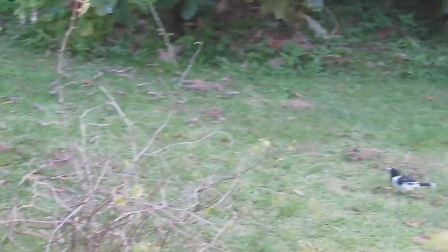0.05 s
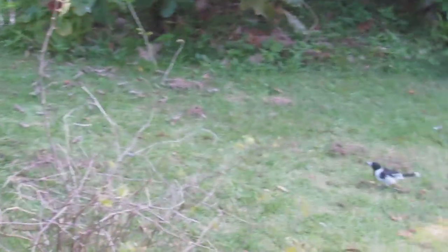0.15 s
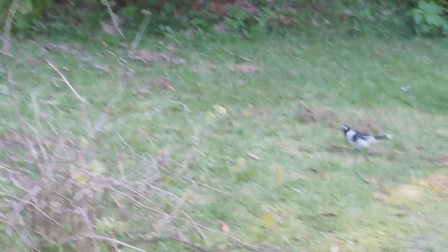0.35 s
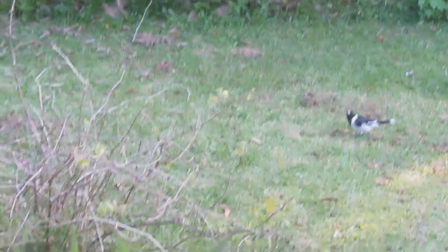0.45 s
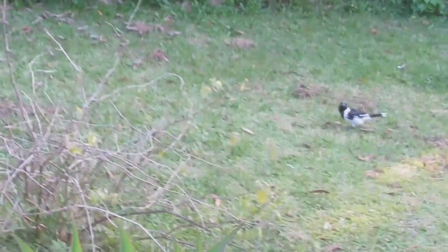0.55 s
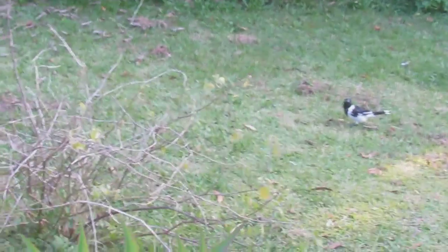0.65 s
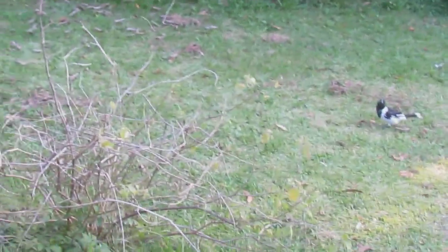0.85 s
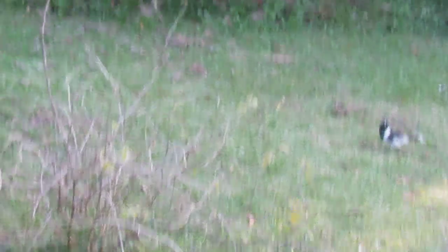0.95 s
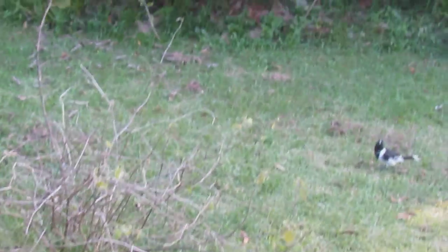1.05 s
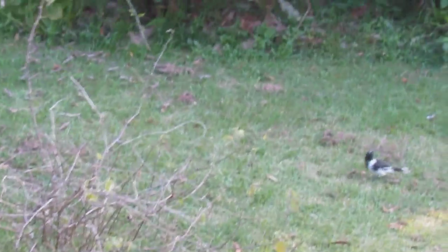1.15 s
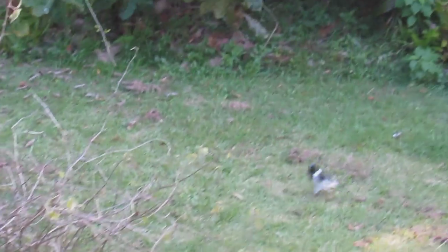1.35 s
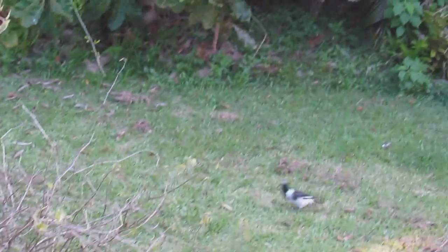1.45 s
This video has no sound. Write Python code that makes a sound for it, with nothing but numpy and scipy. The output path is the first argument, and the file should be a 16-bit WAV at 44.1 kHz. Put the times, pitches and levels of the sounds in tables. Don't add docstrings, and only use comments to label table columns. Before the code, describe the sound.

Moderately distant from the microphone, a bird rasps harshly, growing louder and brighter, then leaps to a brief pure whistle that rings off trees; far birds twitter thinly after it, over soft hum and hiss.

```python
import sys
import numpy as np
from scipy import signal
from scipy.fft import rfft, irfft, next_fast_len
from scipy.io import wavfile
from scipy.ndimage import uniform_filter1d, map_coordinates

SR = 44100
rng = np.random.default_rng(int(sys.argv[2]) if len(sys.argv) > 2 else 0)


def store_pcm(level_fs):
    pcm = np.round(np.clip(level_fs, -1, 1) * 32767).astype(np.int16)
    wavfile.write(sys.argv[1], SR, np.atleast_2d(pcm).T)


def volts_from_db(level):
    exponent = np.asarray(level, float) / 20
    return 10 ** exponent


N = 66150
TIME = np.arange(N) / SR
SIDE = np.array([[.5], [-.5]])


def unit(x):
    return x / np.sqrt(np.mean(x ** 2) + 1e-20)


def along(points, hz):
    f, values = np.transpose(points)
    return np.interp(np.log(hz + 1), np.log(f + 1), values)


def curves(rows):
    s, *columns = np.transpose(rows)
    return [np.interp(TIME, s, column) for column in columns]


def wobble(rate):
    return map_coordinates(rng.standard_normal(N // 8), [TIME * rate])


def tone_phase(hz):
    return 2 * np.pi * np.cumsum(hz) / SR


def filtered(x, response):
    m = next_fast_len(N + SR // 2)
    return irfft(rfft(x, m) * response(np.fft.rfftfreq(m, 1 / SR)), m)[..., :N]


def resonances(rows, f):
    return sum(volts_from_db(db) * (1j * f * w / (c * c - f * f + 1j * f * w)) ** 2 for c, w, db in rows)


# frequency in Hz, lead of left over right in radians.
PHASE_LEAD = [(100, -2.07), (6000, 0.56), (8200, -2), (11000, -1.07), (15000, -1.1)]


def ports(x, pan):
    return filtered(x, lambda f: volts_from_db(SIDE * along(pan, f)) * np.exp(1j * SIDE * along(PHASE_LEAD, f)))


# time in seconds, pulse pitch in Hz, flutter in cycles per second,
# level in dB, flutter depth on the low partials (0-1).
RASP = [(.128, 607.8, 142.5, -48, 0.65), (.16, 610, 143, -30.5, 0.2), (.22, 631, 108.5, -31.5, 0.18),
        (.3, 694.7, 116.5, -29.5, 0.07), (.432, 750, 118, -30.5, 0.55), (.443, 602.2, 121, -26, 0.74),
        (.55, 714.4, 127, -22.5, 0), (.61, 835.5, 138.6, -20.5, 0.37), (.66, 954, 135, -17.5, 1.1),
        (.716, 1075, 140, -16.5, 0.2), (.78, 1197, 148.4, -21, 0.32), (.8, 1548, 126, -17, 0),
        (.818, 1950, 150, -32, 0.9)]
POSTURE_S = [
    .22,
    .41,
    .46,
    .59,
    .655,
    .76,
]
# resonance in Hz, width in Hz, level in dB.
SHUT = [(724, 320, -7), (1233, 184, 1), (2580, 370, -12), (3650, 590, -7), (4800, 970, -3), (6120, 710, -6),
        (7660, 1760, -10.5), (10100, 1200, -14)]
CLOSED = [(808, 200, 1), (1165, 120, 8), (1680, 114, 8), (2900, 510, -3), (3600, 650, -2.5), (5120, 760, 5),
          (6370, 1100, 0.5), (7960, 1800, -4.5), (10400, 920, -7)]
HALF_OPEN = [(800, 260, -4), (1300, 240, 2.5), (1764, 82, -5), (3500, 950, -1), (4820, 810, 5),
             (6700, 1300, 2.5), (7800, 2600, -5.5), (11320, 1300, -6)]
WIDER = [(750, 75, -12), (990, 200, -7), (1435, 274, -2.5), (1920, 200, -17), (3500, 160, -1),
         (4600, 1300, -2), (6680, 1730, -1.5), (7800, 3100, -3.5), (11330, 1330, -9)]
OPEN = [(1003, 175, -5.5), (1596, 150, 0), (1900, 540, -7.5), (4080, 910, 5.5), (4540, 510, 2.5),
        (6580, 1300, 4.5), (7770, 1700, -0.5), (11270, 810, -3.5)]
WIDE = [(1100, 360, -8), (1750, 400, -11), (2250, 600, -12), (3480, 600, -2.5), (4380, 520, -.5),
        (5000, 400, -6), (6900, 900, 1), (8340, 3500, -9), (11640, 870, -10.5)]
# frequency in Hz, left over right in dB.
HEAD_AWAY = [(60, -1), (180, -3), (550, -2), (1650, 1.5), (4970, 11.5), (15000, -3)]
HEAD_FACING = [(60, -.5), (1300, -.5), (2400, 0), (4400, 2.5), (7000, 8), (11000, -1), (15000, -3)]
JITTER_CYCLES, PITCH_WANDER = .017, .008
BEND_RADIANS, BENT_PARTIALS = -.8, 2.5
CHOP_SHARPNESS, HIGH_CHOP = 2.8, .22
THROB_PER_S, THROB_PEAK_S, THROB_DB = 21.9, .566, .5
BREATH_SHARE, BREATH_FROM_HZ = .48, 1300
CLAP_LEVEL, CLAP_TOP_HZ = .18, 2200


def rasp():
    hz, flutter, level_db, chop = curves(RASP)
    beat = tone_phase(flutter * (1 + .03 * wobble(40)))
    phase = tone_phase(hz * (1 + PITCH_WANDER * wobble(70)))
    phase = phase + 2 * np.pi * JITTER_CYCLES * wobble(700)

    k = np.arange(1, 23)[:, None]
    bend = np.minimum(k, BENT_PARTIALS) * BEND_RADIANS * np.sin(beat)
    partials = np.cos(k * phase + bend) * (k * hz < 16000)

    chop = np.clip(chop, 0, 1)
    throb = volts_from_db(THROB_DB * np.cos(2 * np.pi * THROB_PER_S * (TIME - THROB_PEAK_S)))
    deep = throb * (1 + chop * np.cos(beat)) ** CHOP_SHARPNESS / (1 + chop ** CHOP_SHARPNESS)
    shallow = 1 + HIGH_CHOP * np.cos(beat)
    pulses = partials[:3].sum(0) * deep + partials[3:].sum(0) * shallow
    pulses = unit(pulses * volts_from_db(1.4 * wobble(700)))

    clicks = np.diff(np.floor(beat / (2 * np.pi)), prepend=0) * volts_from_db(wobble(120))
    claps = unit(filtered(clicks, lambda f: 1 / (1 + (f / CLAP_TOP_HZ) ** 4)))

    gated = rng.standard_normal(N) * (.3 + np.exp(np.cos(phase)))
    breath = unit(filtered(gated, lambda f: 1 / (1 + (BREATH_FROM_HZ / (f + 1)) ** 4))) * shallow

    voiced = np.sqrt(1 - BREATH_SHARE) * (pulses + CLAP_LEVEL * claps)
    source = (voiced + np.sqrt(BREATH_SHARE) * breath) * volts_from_db(.14 * wobble(32.5))
    level = (TIME > RASP[0][0]) * (TIME < RASP[-1][0]) * volts_from_db(level_db)

    def posture(rows, weights):
        shaped = unit(filtered(source, lambda f: resonances(rows, f)))
        return level * np.interp(TIME, POSTURE_S, weights) * shaped

    postures = (SHUT, CLOSED, HALF_OPEN, WIDER, OPEN, WIDE)
    voices = [posture(rows, weights) for rows, weights in zip(postures, np.eye(6))]
    return ports(sum(voices[:2]), HEAD_AWAY) + ports(sum(voices[2:]), HEAD_FACING)


# time in seconds, pitch in Hz, level in dB.
WHISTLE = [
    (.787, 1540, -36),
    (.797, 1580, -27),
    (.8005, 2350, -29),
    (.805, 2450, -26),
    (.81, 2720, -19),
    (.822, 2725, -15),
    (.831, 2660, -10),
    (.842, 2620, -15.5),
    (.862, 2610, -15),
    (.876, 2610, -38),
]
# multiple of the pitch, level in dB re the loudest moment,
# peak time in seconds, spread in seconds.
OVERTONES = [
    (2, -27.5, 0.83, 0.032),
    (3, -14, .842, 0.0051),
    (4, -22.5, 0.84, 0.013),
    (5, -39, .835, 0.0085),
    (3, -16, .82, 0.011),
    (4, -17, .806, 0.0025),
    (5, -24, .805, 0.0049),
]
# frequency in Hz, left over right in dB.
WHISTLE_PAN = [(2600, -2), (5200, 6), (8000, 5.5), (13000, -8)]


def whistle():
    hz, level_db = curves(WHISTLE)
    on = (TIME > WHISTLE[0][0]) & (TIME < WHISTLE[-1][0])
    phase = tone_phase(uniform_filter1d(hz, size=70))
    loudest_db = max(row[2] for row in WHISTLE)
    tone = volts_from_db(level_db) * np.sin(phase)
    for k, db, peak_s, spread_s in OVERTONES:
        waver_db = 3.5 * 2.8 / k * wobble(180.35)
        bloom = np.exp(-.5 * ((TIME - peak_s) / spread_s) ** 2)
        tone = tone + volts_from_db(db + loudest_db + waver_db) * bloom * np.sin(round(k) * phase)
    return ports(np.sqrt(2) * on * tone, WHISTLE_PAN)


# delay in seconds, level in dB, left over right in dB.
WALLS = [
    (.052, -21.5, 6),
    (0.082, -25.5, -9),
    (.128, -34.5, -11),
    (.2, -35, -1),
    (0.271, -34, 4),
]


def walls(x):
    def response(f):
        returns = sum(volts_from_db(db + SIDE * pan_db) * np.exp(-2j * np.pi * f * s) for s, db, pan_db in WALLS)
        return returns / (1 + (f / 6500) ** 2)

    return filtered(x, response)


def echoes(x, decay, delay_s):
    hz, t, z = signal.stft(rng.standard_normal((2, SR)), SR, nperseg=256)
    decaying = z * volts_from_db(-60 * t / along(decay, hz)[:, None])
    tail = signal.istft(decaying, SR, nperseg=256)[1]
    tail = np.pad(tail, ((0, 0), (0, N)))[:, :N]
    tail = filtered(tail, lambda f: np.exp(-2j * np.pi * f * delay_s) / np.sqrt(along(decay, f)))
    return signal.fftconvolve(x, tail / np.linalg.norm(tail[0]), axes=1)[:, :N]


# frequency in Hz, time to fall 60 dB in seconds.
BUSHES = [(500, 0.051), (3000, 0.35), (12000, 0.049)]
TREES = [(500, 0.12), (2700, 1), (5400, 0.41), (7000, 0.061), (10500, 0.16), (12000, 0.064)]
# frequency in Hz, level in dB.
SCATTER = [(600, -14), (1500, -11), (2700, -8), (5000, -2), (12000, -1)]
BUSHES_DB, TREES_DB, TREES_FROM_HZ = -7, -16.5, 1500


def foliage(bird, far):
    near = filtered(bird, lambda f: volts_from_db(along(SCATTER, f))) + far
    high = filtered(bird + far, lambda f: 1 / (1 + (TREES_FROM_HZ / (f + 1)) ** 2))
    return volts_from_db(BUSHES_DB) * echoes(near, BUSHES, .004) + volts_from_db(TREES_DB) * echoes(high, TREES, .033)


# start in seconds, length in seconds, first pitch in Hz, last pitch in Hz,
# level in dB, octave level in dB.
WARBLE = [(0.984, 0.032, 3780, 3730, -57, -76), (1.013, 0.043, 3606, 3500, -37.5, -70),
          (1.028, 0.0495, 3110, 3370, -38.5, -48), (1.074, .04, 3250, 3340, -50, -49),
          (1.136, 0.019, 2480, 2530, -41, -71), (1.148, 0.066, 3300, 3420, -48.5, -73),
          (1.191, .048, 2922, 3146, -40, -55), (1.229, 0.058, 3050, 3176, -48, -53),
          (1.295, 0.018, 4600, 4580, -50, -80), (1.317, 0.016, 4460, 4200, -44, -80),
          (1.322, 0.025, 3040, 3435, -43.5, -43), (1.375, .016, 2960, 3100, -48, -45)]


def far_warbler():
    notes = np.zeros(N)
    for start_s, length_s, from_hz, to_hz, db, octave_db in WARBLE:
        u = np.clip((TIME - start_s) / length_s, 0, 1)
        phase = tone_phase(from_hz + (to_hz - from_hz) * u)
        swell = np.sqrt(np.abs(np.sin(np.pi * u ** .87))) * (u < 1)
        notes += swell * (volts_from_db(db) * np.sin(phase) + volts_from_db(octave_db) * np.sin(2 * phase))
    return np.sqrt(2) * notes * volts_from_db(3.5 * wobble(130) + SIDE * -2)


# time in seconds, pitch in Hz, level in dB.
THIN = [
    (1.335, 3962, -39),
    (1.347, 4255, -39.5),
    (1.365, 3927, -36),
    (1.383, 3930, -50),
    (1.389, 4147, -37.5),
    (1.429, 4220, -37.5),
    (1.462, 4330, -53),
    (1.475, 4300, -35.5),
    (1.5, 4530, -41.5),
]


def thin_whistler():
    hz, level_db = curves(THIN)
    onset = np.clip((TIME - THIN[0][0]) / .011, 0, 1)
    thin = volts_from_db(level_db + wobble(89.5)) * onset * np.sin(tone_phase(hz))
    return np.sqrt(2) * thin * volts_from_db(SIDE * 2)


# frequency in Hz, left-right likeness (0-1).
LIKENESS = [(60, 0.78), (180, 0.92), (550, 0.89), (1650, 0.57), (4970, 0.34), (15000, 0.068)]
# frequency in Hz, left over right in dB.
NOISE_PAN = [(60, -1.5), (180, -2), (550, -0.5), (1650, -3), (4970, 7.5), (15000, 4.5)]


def rush(spectrum, patchy_db):
    z = signal.stft(rng.standard_normal((2, N)), nperseg=512)[2]
    field = uniform_filter1d(rng.standard_normal(z.shape[1:]), size=6, axis=0)
    field = uniform_filter1d(field, size=12, axis=1)
    pair = signal.istft(z * volts_from_db(patchy_db * unit(field)), nperseg=512)[1][:, :N]

    def mid_side(f):
        angle = np.arccos(np.clip(along(LIKENESS, f), -1, 1)) / 2
        return volts_from_db(along(spectrum, f)) * np.array([np.cos(angle), np.sin(angle)])

    mid, side = filtered(pair, mid_side)
    both = unit(np.array([mid + side, mid - side]))
    return filtered(both, lambda f: volts_from_db(SIDE * along(NOISE_PAN, f)))


# frequency in Hz, level in dB per Hz.
HISS = [(900, -25), (1600, -11), (2600, -7), (4500, -1), (6600, -6), (8200, 0), (9600, -9), (15500, -25)]


def insects():
    return volts_from_db(-42) * rush(HISS, patchy_db=1.9)


# frequency in Hz, rms level in dB.
ENGINE_ORDERS = [
    (75.5, -54),
    (151, -53.5),
    (226.5, -55.5),
    (300, -62),
]


def engine():
    total = np.zeros(N)
    for hz, db in ENGINE_ORDERS:
        level = volts_from_db(db + 2.8 * wobble(6.19))
        total += level * np.sin(2 * np.pi * hz * TIME + .74 * wobble(7.49))
    return np.sqrt(2) * total


# frequency in Hz, level in dB per Hz.
RUMBLE = [(15, -42), (25, -5), (151, -8), (188, -7.5), (226, -6.5), (344, -9), (544, -13), (2000, -28),
          (2600, -78), (4400, -120)]


def traffic():
    return volts_from_db(-44 + .42 * wobble(1.1)) * rush(RUMBLE, patchy_db=2)


def scene():
    note = whistle()
    bird = rasp() + note
    far = far_warbler() + thin_whistler()
    background = insects() + engine() + traffic()
    return bird + walls(note) + foliage(bird, far) + far + background


def roll_off(x):
    return signal.sosfilt(signal.butter(12, 15700, fs=SR, output="sos"), x)


def record(dry):
    mix = filtered(dry, lambda f: 1 / np.sqrt(1 + (f / 14400) ** 40))
    return roll_off(mix)


dry = scene()
out = record(dry)
store_pcm(out)
```